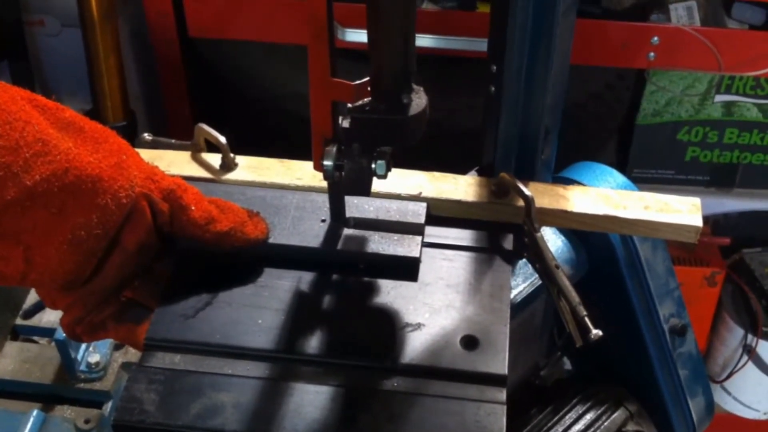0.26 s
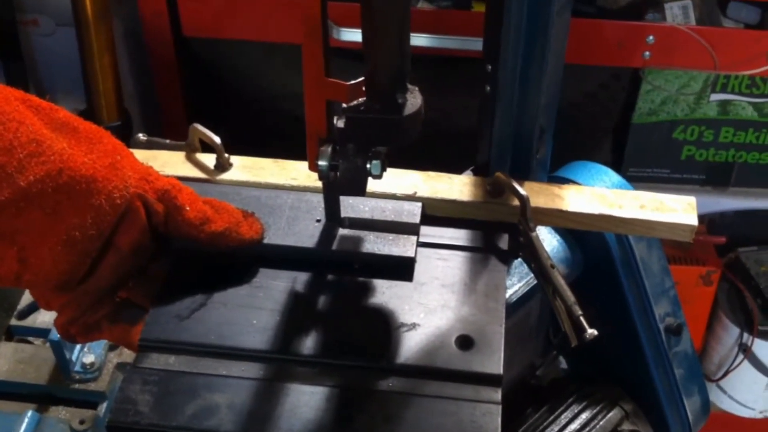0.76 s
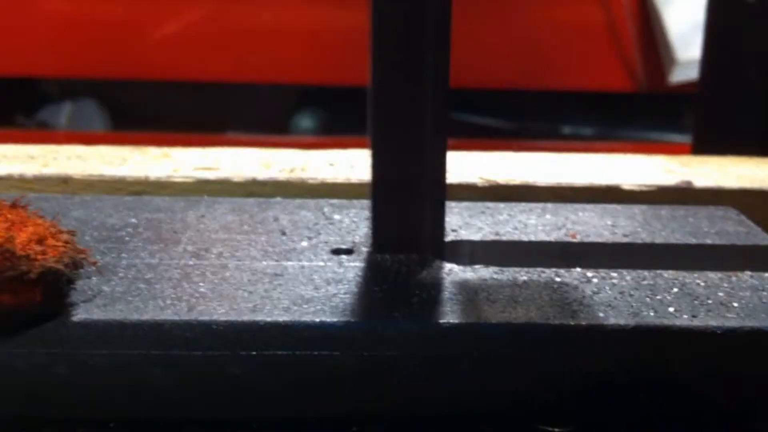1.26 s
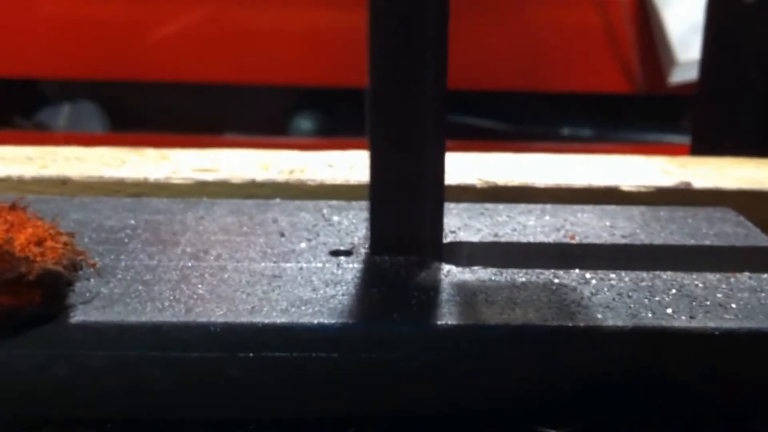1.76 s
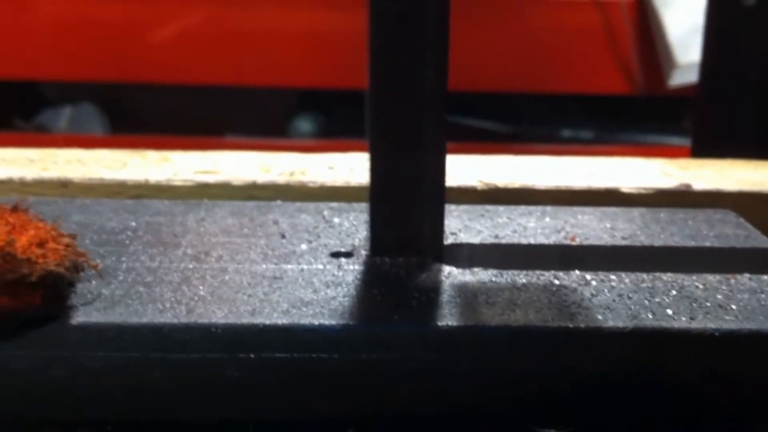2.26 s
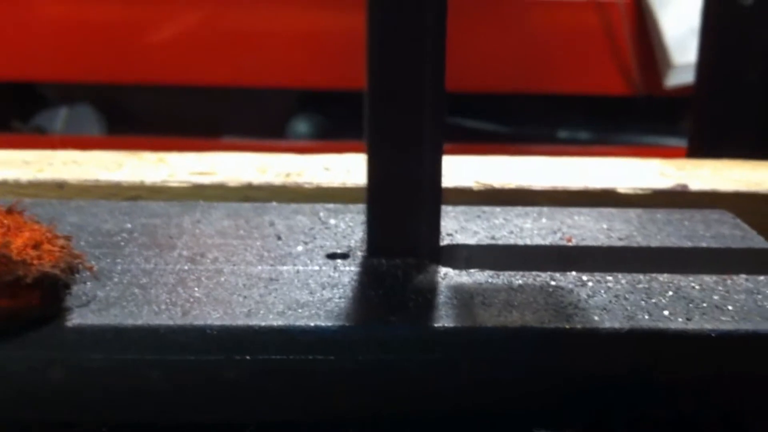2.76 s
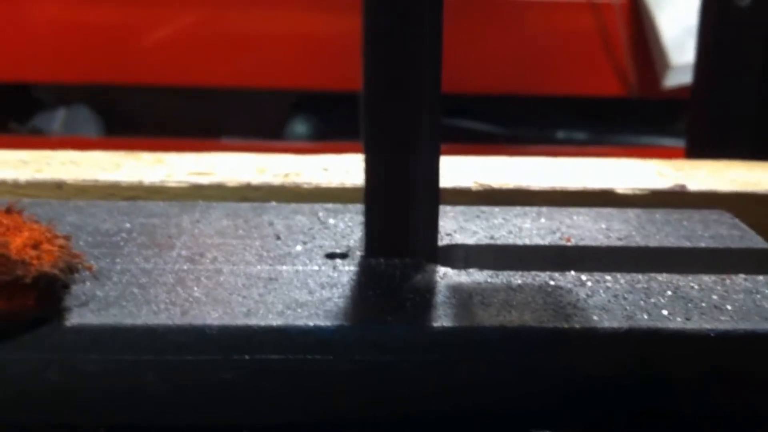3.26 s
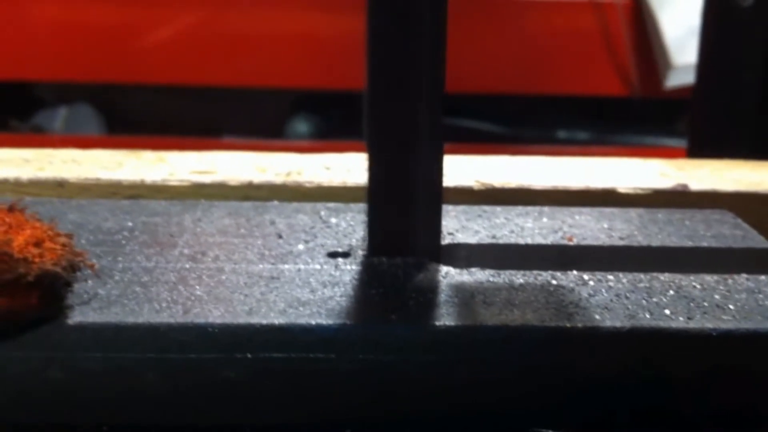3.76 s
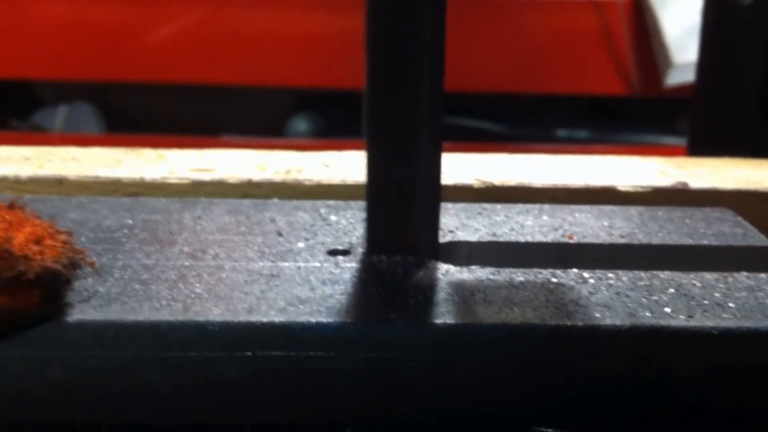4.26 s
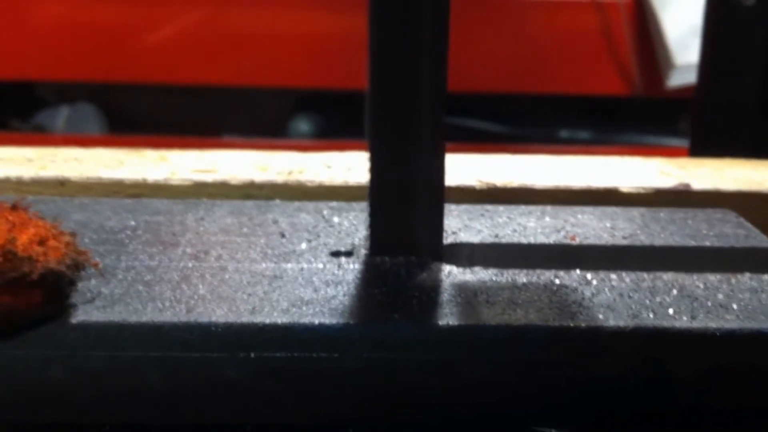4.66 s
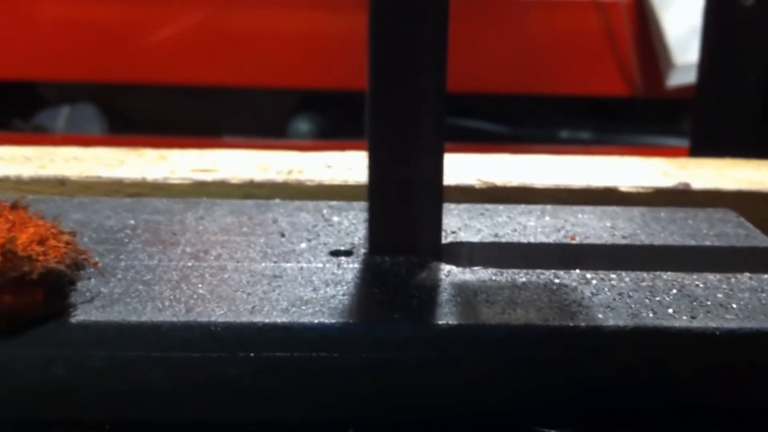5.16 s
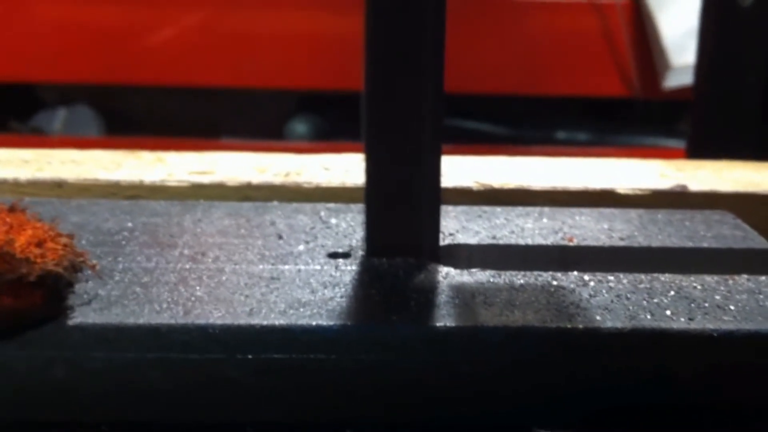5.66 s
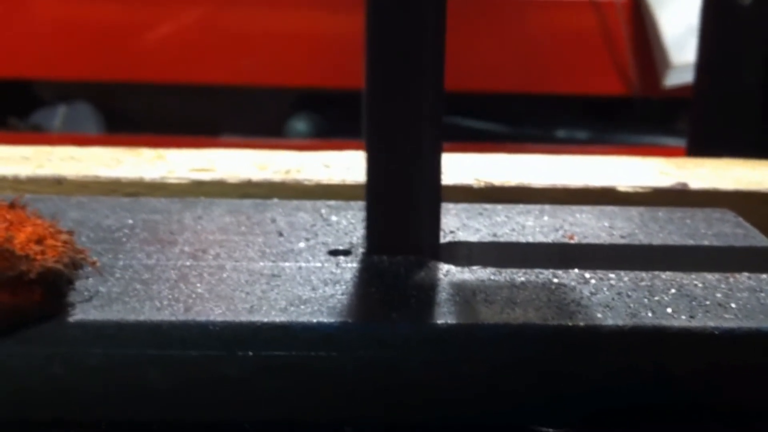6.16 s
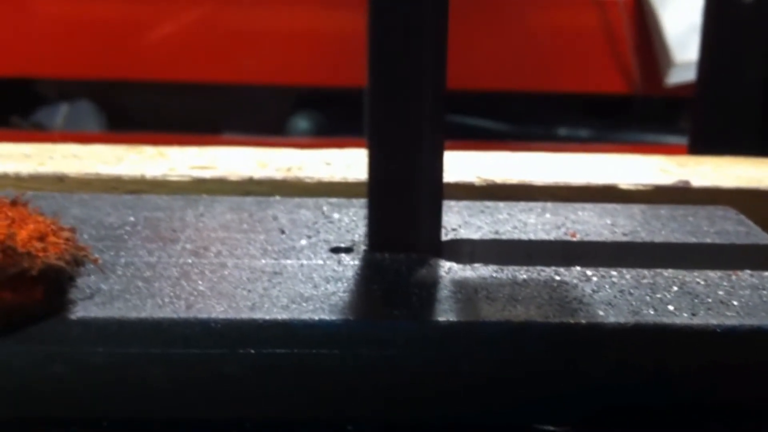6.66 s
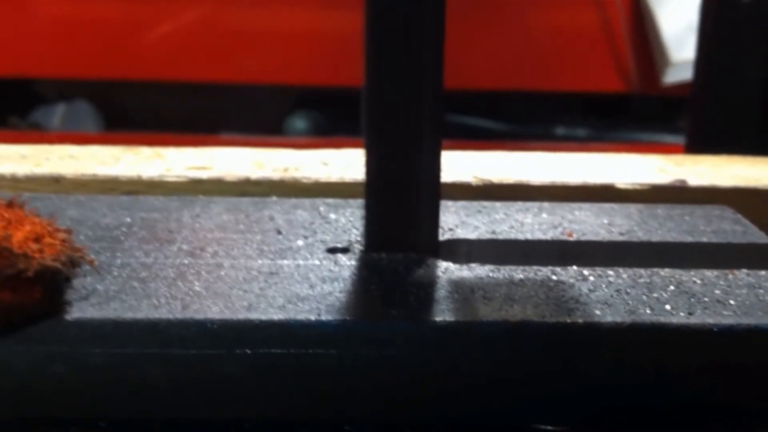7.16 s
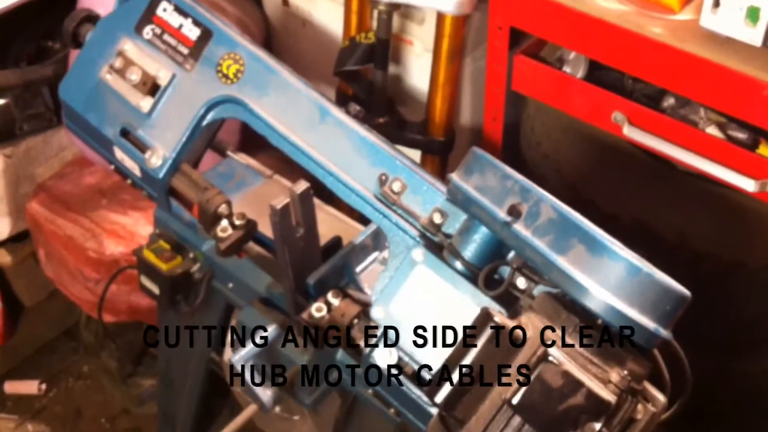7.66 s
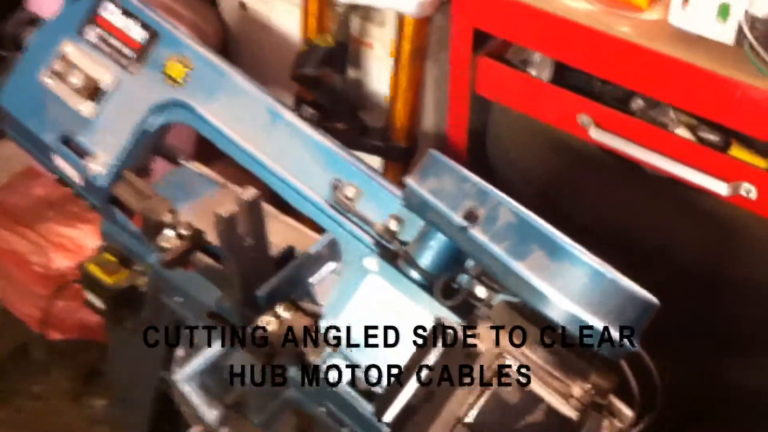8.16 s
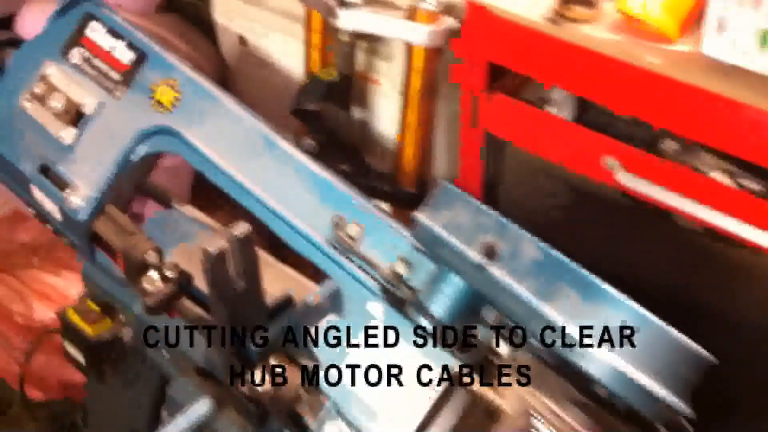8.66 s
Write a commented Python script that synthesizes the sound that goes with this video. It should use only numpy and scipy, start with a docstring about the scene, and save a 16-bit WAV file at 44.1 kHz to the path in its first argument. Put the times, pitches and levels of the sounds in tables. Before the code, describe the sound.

Continuous sawing of steel heard from three microphone positions, separated by gaps under a tenth of a second. First a moderate gritty rasp with several knocks; then a long, loud close rasp, ringing at mid pitch, with thin squeals and irregular knocks over strong hum; last a softer, steadier grind with fading low moan and faint chirping squeaks. Small workshop, mono, abrupt cuts.

```python
"""Band saw cutting steel bar

A saw works in a small workshop, heard in three stretches from three places with short silences between.
Its teeth, random chips over hiss, bite unevenly in a pattern that returns with every lap of the blade.
Their rasp drives resonances of bar, blade and frame; now and then a tooth snags with a knock.
Sines at multiples of twice the mains frequency are the motor hum; coloured noise is the wheel rumble
and a narrow ring the gearbox whine. The last place adds a low moan and faint squeaks."""
import sys
import numpy as np
from scipy import signal
from scipy.fft import rfft, irfft, next_fast_len
from scipy.io import wavfile
from scipy.ndimage import uniform_filter1d

SR = 44100
rng = np.random.default_rng(int(sys.argv[2]) if len(sys.argv) > 2 else 0)


def dump_mix(stems):
    """Bounce the given channels to the path in sys.argv[1] as a 16-bit WAV at rate SR."""
    frames = np.atleast_2d(stems).T  # one column per channel
    limited = np.clip(frames, -1, 1)  # hard clip at full scale
    pcm = np.round(limited * 32767).astype(np.int16)
    wavfile.write(sys.argv[1], SR, pcm)


N = 393372

# Stretches of sawing, one a place. Each row: start in seconds, end in seconds.
STRETCHES_S = [(0, 1.233), (1.33, 7.247), (7.322, 8.92)]
# Share by which the pitch of bar and frame strays, one value a place.
BODY_WANDER_SHARE = [0, 0, .006]


def from_db(db):
    """Amplitude factor of a level in dB."""
    return 10 ** (np.asarray(db) / 20)


def rms_one(x):
    """Scales x to rms 1."""
    return x / np.sqrt(np.mean(x ** 2) + 1e-20)


def drift(rate_hz, size):
    """Slow chance: noise twice through a one-pole low-pass, run in for 1 s; rms 1."""
    r = np.exp(-2 * np.pi * rate_hz / SR)
    slow = signal.lfilter([1], [1, -2 * r, r * r], rng.standard_normal(size + SR))
    return rms_one(slow[SR:])


def colour(x, spectrum):
    """Gives x a smooth spectrum; rms 1."""
    size = next_fast_len(len(x))
    hz, db = np.transpose(spectrum)
    bins_hz = np.arange(size // 2 + 1) * SR / size
    gain = from_db(np.interp(np.log(bins_hz + 1), np.log(hz), db))
    return rms_one(irfft(rfft(x, size) * gain, size)[:len(x)])


def resonate(x, peaks):
    """Parallel two-pole resonances with alternating signs."""
    out = 0
    for k, (hz, width_hz, db) in enumerate(peaks):
        r = np.exp(-np.pi * width_hz / SR)
        b = (1 - r * r) / 2 * np.array([1, 0, -1])
        a = [1, -2 * r * np.cos(2 * np.pi * hz / SR), r * r]
        out = out + (-1) ** k * from_db(db) * signal.lfilter(b, a, x)
    return out


def resonate_twice(x, hz, width_hz, db, widening):
    """One mode passed twice, the second time wider, for steeper skirts."""
    return resonate(resonate(x, [(hz, width_hz, db)]), [(hz, widening * width_hz, 0)])


def steady(x, share):
    """Evens out part of the chance swells in a ring's height; rms 1."""
    height = np.sqrt(uniform_filter1d(x * x, SR // 60)) + 1e-9
    return rms_one(x / height ** np.clip(share, 0, 1))


def caught(x, modes, patchy_db):
    """Each mode is caught and let go on its own as blade and work shift; rms 1."""
    out = 0
    for hz, width_hz, db in modes:
        grip = from_db(patchy_db * drift(9.8, len(x)))
        out = out + grip * resonate_twice(x, hz, width_hz, db, 3.2)
    return rms_one(out)


def wander(x, share):
    """Lets the pitch stray slowly by reading faster and slower."""
    lead = np.cumsum(share * drift(4.0, len(x)))
    index = np.arange(len(x))
    return np.interp(index + lead, index, x, period=len(x))


def cut(place, t):
    """Gains of rasp, bar and squeal: pressure, a swell at each uneven spot of the passing blade, flicker."""
    # Pressure of the work on the blade, a list a stretch. Each row: time in seconds, pressure in dB.
    feed_table = [
        [(0, -1), (.3, -.5), (.85, -1), (1.05, 1), (1.23, 0)],
        [(1.33, 0), (1.8, 0.34), (2.3, 0), (2.8, .5), (3.3, 0), (3.9, -0.5), (4.5, 0.5), (5.0, 0), (5.5, 0),
         (6.2, 0.5), (6.7, 0.9), (7.0, -1.4), (7.25, -1.5)],
        [(7.33, 0), (7.7, 0), (8.3, 1.04), (8.92, 0)],
    ]
    # Uneven spots, met once a lap. Each row: seconds into the lap, half length in seconds,
    # then full rise in dB of rasp, bar ring and squeal.
    spots = [(0.046, 0.036, 3, 9, 5), (0.193, 0.024, 3, 13, 5.5), (0.272, 0.023, 8, 15, 2.5),
             (0.403, 0.04, 3, 5, 4.5), (0.501, 0.032, 5, 14.5, 7), (0.58, 0.0097, 3.5, -5, 0.5),
             (0.7, 0.015, 3.5, 15, 4), (0.933, 0.018, 4, 11, 4), (1.143, 0.026, 4, 16.5, 7),
             (1.247, 0.039, 2, 4, 0.5), (1.367, 0.041, 2, 1, -7), (1.566, 0.017, 3, 14, 3.5),
             (1.8, 0.028, 1, 4, 5.5), (2.034, 0.037, 5.5, 15, 3.5), (2.235, .025, 3, -1, 5),
             (2.353, 0.038, 4, 14, 5.5), (2.455, 0.031, 9.5, 15, 5.5), (2.579, 0.058, 5, 13.5, 3),
             (2.723, 0.027, 2, 13.5, 0.5), (2.815, 0.025, 2.5, 7, 4.5), (3.023, 0.046, 5, 17.5, 4)]
    # Share of each full rise heard, a row a place: rasp, bar, squeal.
    bite_share = [(0.99, 1, 1), (0.87, 0.63, 1), (0.084, 0, 0.23)]
    # How far round the blade is when each stretch begins, in seconds.
    lap_at_start_s = [2.47, 0, 0]
    # Extra squeal at single moments, on top of the lap pattern.
    # Each row: time in seconds, added level in dB.
    extra_squeal = [(2.42, 3.5), (2.69, 17.5), (3.32, 5.5), (3.84, 2.5), (4.03, 3), (4.55, 0), (4.79, 4),
                    (4.93, 1.5), (5.18, 5.5), (5.25, 3), (5.46, 2.5), (5.6, 6.5), (5.87, 13.5), (6.08, 3),
                    (6.53, 6.5), (6.86, 1), (6.92, 1)]
    lap_s, extra_half_s, flicker_hz = 3.183, 0.016, 13.5

    coarse = t[::32]
    feed_db = np.interp(coarse, *np.transpose(feed_table[place]))
    lap = coarse - STRETCHES_S[place][0] + lap_at_start_s[place]
    swells = 0
    for s, half_s, *rises_db in spots:
        away = (lap - s + lap_s / 2) % lap_s - lap_s / 2
        swells = swells + np.outer(rises_db, np.exp(-0.5 * (away / half_s) ** 2))
    rasp_db, bar_db, squeal_db = swells * np.array(bite_share[place])[:, None]
    rasp_db = rasp_db + feed_db
    # bar and squeal follow the pressure by 4 and 0.79 dB per dB
    bar_db = bar_db + 4 * feed_db + 3.5 * drift(flicker_hz, len(t))[::32]
    squeal_db = squeal_db + 0.79 * feed_db + 1.37 * drift(flicker_hz, len(t))[::32]
    for s, db in extra_squeal:
        squeal_db = squeal_db + db * np.exp(-0.5 * ((coarse - s) / extra_half_s) ** 2)
    return [np.interp(t, coarse, from_db(db)) for db in (rasp_db, bar_db, squeal_db)]


def teeth(size, per_s, spread_db, smooth):
    """Chips break at random moments with uneven force, on the smooth hiss of rubbing; rms 1."""
    chips = (rng.random(size) < per_s / SR) * rng.choice([-1, 1], size)
    chips = chips * from_db(spread_db * np.minimum(rng.exponential(1, size), 3.5))
    return rms_one(rms_one(chips) + smooth * rng.standard_normal(size))


def flecks(size):
    """Bigger chips each ring one of the many small modes of bar, vice and table for some cycles; rms 1."""
    pitches_hz = np.geomspace(450, 2500, 24)
    chips = teeth(size, 900, 4.2, 0)
    dealt = rng.integers(0, 24, size)
    out = 0
    for k, hz in enumerate(pitches_hz):
        out = out + resonate(chips * (dealt == k) + 1e-18, [(hz, hz / 89.0, 0)])
    return rms_one(out)


def echoes(x):
    """Bench, walls and shelves send back a spray of early echoes that ripples the spectrum; rms 1."""
    lags_s = rng.uniform(0.0022, 0.03, 14)
    spray = np.zeros(SR // 20)
    spray[(lags_s * SR).astype(int)] = from_db(-11.5 - 60 * lags_s / 0.067) * rng.choice([-1, 1], 14)
    spray[0] = 1
    return rms_one(signal.fftconvolve(x, spray)[:len(x)])


def rasp_sound(place, bite, load, top):
    """Rasp of the teeth: coloured bite with echoes, chip flecks, and a treble with its own swell."""
    # Broad colour, a list a place. Each row: frequency in Hz, relative level in dB per Hz.
    spectra = [
        [(290, -97), (500, -2.5), (657, -12), (758, -16), (1030, -11.5), (2100, -9), (3430, -27.5), (8600, -25),
         (10200, -30.5), (12700, -26), (15500, -39)],
        [(290, -76), (500, -13), (748, -9.5), (1270, -14), (2010, -11), (4020, -24.5), (4770, -25), (5200, -20),
         (5880, -25), (6740, -23), (11300, -30), (15500, -34.5)],
        [(290, -57), (500, -8), (954, -11), (1090, -5), (1330, -12), (2230, -12), (6270, -25.5), (7240, -25),
         (10500, -21.5), (14400, -27), (15500, -33)],
    ]
    size = len(bite)
    coloured = colour(echoes(bite), spectra[place])
    high_pass = signal.butter(2, 4100, "high", fs=SR, output="sos")
    treble = signal.sosfilt(high_pass, coloured)
    chips = from_db(-16.0 + 2.8 * drift(25, size)) * flecks(size)
    return load * (coloured - treble + chips) + top * treble


def bar_sound(place, bite):
    """The bite rings the strongest modes of the bar; rms about 1."""
    # A list a place. Each row: frequency in Hz, width in Hz, relative level in dB.
    modes = [
        [(754, 38, 0)],
        [(744.5, 23, 23), (796, 16, 11)],
        [(376.5, 33, 9.5), (393, 16, 11.5)],
    ]
    ring = steady(resonate(bite, modes[place]), share=0.4)
    return wander(ring, BODY_WANDER_SHARE[place])


def frame_sound(place, bite):
    """The bite rings the frame, mode by mode; rms about 1."""
    # A list a place. Each row: frequency in Hz, width in Hz, relative level in dB.
    modes = [
        [(380, 23, 12), (1157, 42, 5), (2060, 61, -14)],
        [(597.6, 14, 9.5), (823, 340, 2.5), (989, 18, 1.5), (1746, 14, 4.5), (1910, 41, 1.5), (2525, 76, 0.5)],
        [(171, 8, -4), (445, 20, -5), (450, 31, -10), (678, 22, 1), (850, 22, 4), (1080, 41, 5), (2230, 110, 0)],
    ]
    return wander(caught(bite, modes[place], patchy_db=2.8), BODY_WANDER_SHARE[place])


def squeal_sound(place, chatter, flare):
    """Two blade resonances that carry the squeal; a strong squeal spreads to the second."""
    # Two rows a place. Each row: frequency in Hz, width in Hz, level in dB before flare and mix.
    modes = [
        [(8540, 120, 4), (9000, 120, -5)],
        [(5142, 113, 2.5), (5277, 125, -1.5)],
        [(5800, 1100, -1.5), (6240, 250, -10)],
    ]
    rings = []
    for hz, width_hz, db in modes[place]:
        ring = resonate_twice(chatter, hz, width_hz, 0, 2.06)
        rings.append(from_db(db) * steady(ring, share=0.35))
    lower, upper = rings
    return wander(lower + flare * upper, 0.0049)


def blade_sound(place, chatter):
    """The teeth ring further modes of the blade; rms 1."""
    # A list a place. Each row: frequency in Hz, width in Hz, relative level in dB.
    modes = [
        [(4440, 430, -6.5), (5020, 1100, 1), (6600, 110, -13), (12500, 400, -8)],
        [(4455, 144, -3.5), (4580, 37, -10), (6100, 71, -7.5), (6617, 54, -5.5), (7240, 170, -15),
         (7590, 19, -9), (7700, 57, -7), (8700, 810, -15), (11180, 200, -13)],
        [(3980, 79, 4), (10200, 200, 9)],
    ]
    return caught(chatter, modes[place], patchy_db=2.0)


def gearbox_whine(place, size):
    """Noise through one narrow gearbox resonance, its height partly evened."""
    # One row a place: frequency in Hz, width in Hz, level in dB rms before the dips under knocks.
    whines = [(531, 14, -45), (529, 9, -36), (374, 14, -43.5)]
    hz, width_hz, db = whines[place]
    ring = resonate(rng.standard_normal(size), [(hz, width_hz, 0)])
    return from_db(db) * steady(ring, share=0.5)


def rumble(place, load):
    """Coloured noise of wheels and gearbox; a harder bite shakes the wheels more."""
    # A list a place. Each row: frequency in Hz, relative level in dB per Hz.
    spectra = [
        [(15, -63), (25, -31), (137, -25), (194, -0.5), (325, -14), (364, 3.5), (454, -17), (700, -51),
         (910, -5), (1540, -120)],
        [(15, -92), (25, -51), (119, -35), (189, -9), (217, -16), (260, -22.5), (467, -18.5), (700, -21.5),
         (910, -27.5), (1540, -120)],
        [(15, -87), (25, -64), (141, -24), (194, -3.5), (325, -15), (374, -7), (450, -8), (560, -36),
         (700, -43), (910, -53), (1540, -120)],
    ]
    size = len(load)
    shaken = (load / np.mean(load)) ** 1.4 * np.mean(load)
    waver = from_db(1.9 * np.tanh(drift(27, size)))
    return shaken * waver * colour(rng.standard_normal(size), spectra[place])


def motor_hum(place, t, load):
    """Induction motor: sines at multiples of twice the mains frequency, rising with the bite."""
    # A row a place: base level in dB rms of multiples 1 to 4.
    levels_db = [(-64, -43, -48.5, -59), (-52, -29.5, -45, -41.5), (-65.5, -52, -51, -43)]
    hum_hz, size, out = 100.03, len(t), 0
    for k, db in enumerate(levels_db[place]):
        lowest = k == 0   # wavers the most
        wobble_rad = (0.044 + 0.71 * lowest) * drift(4.2, size)
        level = from_db(db + (1.2 + 1.3 * lowest) * drift(4.6, size))
        line = np.sin(2 * np.pi * (k + 1) * hum_hz * t + wobble_rad + k)
        out = out + np.sqrt(2) * load / np.mean(load) * level * line
    return out


def snags():
    """A blow and the judder after it ring the bar's modes; a burst of tearing noise comes with them."""
    # A tooth snags. Each row: time in seconds, relative levels in dB of knock and crack, t60 in seconds
    # of the judder, relative level in dB of the sizzle, lift in dB of the modes above 900 Hz, rise in ms.
    snag_table = [(0.0, -17.5, -24, 0.37, -35, 0, 2.1), (0.114, -15.5, -17, 0.086, -40, 4, 4),
                  (0.235, -24, -38, 0.1, -50, -6, 6), (0.54, -10, -12, 0.14, -22, 4, 3),
                  (0.959, -11, -11, 0.045, -17.5, 10, 2.2), (0.999, -19, -21, 0.31, -42, -7, 3.3),
                  (1.207, -18, -39, 0.069, -47, 1, 2.7), (1.332, -19.5, -24, .08, -48, -8, 3.3),
                  (1.364, -20, -15.5, 0.53, -44, 3, 3.5), (1.592, -9, -7, 0.15, -21, 2, 1.9),
                  (2.258, -11, -31, 0.12, -45, -36, 6.4), (2.444, -1.5, -40, 0.073, -45, -1, 18),
                  (3.354, -8.5, -20, 0.11, -25, -5, 2.8), (3.658, -14, -41.5, 0.22, -45, 9.5, 3.9),
                  (3.764, -9.5, -22, 0.066, -19, 1, 4), (3.789, -18, -25, 0.043, -37, -2, 2.2),
                  (4.28, -30, -26, .05, -45, 27, 2.7), (4.351, -6.5, -12, 0.027, -30, 8, 0.8),
                  (4.546, -13, -8, 0.085, -34, 4, 4), (4.769, -18, -8, 0.05, -16.5, 17.5, 1.6),
                  (4.966, -16, -31, 0.072, -42, -13, 5.5), (5.004, -8.5, -7.5, 0.072, -24, 8, 0.64),
                  (5.016, -17, -30, 0.051, -37, -10, 1.8), (5.392, -13.5, -18, 0.071, -45, 6, 1.9),
                  (5.445, -12.5, -30, 0.041, -45, -5, 4.4), (5.649, -25.5, -26, 0.074, -25, 25.5, 4.7),
                  (6.488, -16, -33, .04, -42, -12, 4.4), (6.54, -3, 5, 0.035, -26, 5, 3.1),
                  (6.748, -10.5, -25, 0.045, -51, -1, 3.3), (6.763, -16, -24, 0.036, -38, 10, 1.7),
                  (6.845, -26.5, -9, 0.056, -21, 19, 1.8), (6.948, -11.5, -19, 0.057, -40, -11, 3.2),
                  (6.962, -5.5, -29, 0.14, -40, 2, 9.9), (8.413, -43, -14, 0.048, -42, 8, 2),
                  (8.497, -43, -15, 0.036, -42, 8, 1.7)]
    # Modes of the bar. Each row: frequency in Hz, relative level in dB, t60 in seconds.
    modes = [(743, 6, 0.035), (634, -13, 0.027), (1038, -14.5, 0.053), (2042, -13, 0.033),
             (2670, -9, 0.0088), (182, -23.5, 0.045)]
    chance_db = rng.normal(0, 4.0, (len(snag_table), len(modes)))
    tear_noise, judder_noise, sizzle_noise = rng.standard_normal((3, N))
    sizzle_band = signal.butter(2, [3800, 11000], "band", fs=SR, output="sos")
    tear_band = signal.butter(2, [500, 4000], "band", fs=SR, output="sos")
    sizzle = rms_one(signal.sosfilt(sizzle_band, sizzle_noise))
    tear = rms_one(signal.sosfilt(tear_band, tear_noise))
    out, size = np.zeros(N), SR // 5
    t = np.arange(size) / SR
    for row, strengths_db in zip(snag_table, chance_db):
        s, knock_db, crack_db, judder_t60_s, sizzle_db, lift_db, rise_ms = row
        rise_ms = max(rise_ms, 0.5)
        at = round(s * SR)
        span = slice(at, at + size)
        dying = from_db(-60 * t / judder_t60_s)
        force = from_db(-29.0) * dying * judder_noise[span]
        force[0] = 1   # the blow
        building = 1 - np.exp(-1000 * t / rise_ms)
        burst = from_db(crack_db - 11.5) * tear[span] + from_db(sizzle_db - 3.5) * sizzle[span]
        sound = dying * building * burst
        for (hz, db, t60_s), more_db in zip(modes, strengths_db):
            r, w = from_db(-60 / (t60_s * SR)), 2 * np.pi * hz / SR
            ring = signal.lfilter([0, np.sin(w)], [1, -2 * r * np.cos(w), r * r], force)
            level_db = knock_db + db + more_db * (db < -3) + lift_db * (hz > 900)
            # the tooth tears free over a few ms, so the ring builds up
            sound += from_db(level_db) * resonate(ring, [(hz, 1000 / np.pi / rise_ms, 0)])
        out[span] += sound
    return out


def moan_sound(t, bite):
    """The bite rings one low, broad resonance whose level falls and wavers."""
    # Each row: time in seconds, level in dB rms before the waver.
    levels = [(7.32, -40), (7.9, -44), (8.35, -42), (8.45, -59), (8.92, -61)]
    level_db = np.interp(t, *np.transpose(levels)) + 3.3 * drift(9.0, len(t))
    return from_db(level_db) * rms_one(resonate_twice(bite, 473, 80, 0, 2))


def squeaks():
    """Short rough tones that swell and fade."""
    # Each row: time in seconds, frequency in Hz, peak level in dB, half length in seconds,
    # share of pitch gained per second, roughness in rad.
    squeak_table = [(8.52, 4050, -39.5, .012, 0, .3), (8.558, 4050, -39.5, .013, 0, .3),
                    (8.845, 2670, -33.5, 0.012, 1.5, .9)]
    t, out = np.arange(N) / SR, np.zeros(N)
    for s, hz, db, half_s, rise, rough_rad in squeak_table:
        swell = np.exp(-0.5 * ((t - s) / half_s) ** 2)
        glide = np.pi * hz * rise * (t - s) ** 2
        phase = 2 * np.pi * hz * t + glide + rough_rad * drift(110, N)
        out += from_db(db) * swell * np.sin(phase)
    return out


def saw(place, t):
    """All steady layers as heard from one place."""
    # Layer levels between the uneven spots, a row a place: rasp, bar, squeal, frame, blade, rumble, in dB.
    mix_db = [(-34.5, -41, -54, -47, -45.5, -39), (-27, -36, -40, -34.5, -36, -30.5),
              (-34.5, -40.5, -47.5, -45, -59, -40)]
    rasp_mix, bar_mix, squeal_mix, frame_mix, blade_mix, rumble_mix = from_db(mix_db[place])
    load, bar, squeal = cut(place, t)
    size = len(t)
    # the bite wavers from tooth to tooth
    flutter = from_db(0.97 * drift(38, size) + 0.066 * drift(74, size))
    bite = flutter * teeth(size, 3000, 0.94, 0.81)
    chatter = flutter * teeth(size, 1500, 0.83, 0.92)
    # the top of the rasp swells with both the bite and the blade
    top = load ** 0.095 * squeal ** 0.023
    top *= np.mean(load) / np.mean(top)
    flare = (squeal / np.mean(squeal)) ** 1.26

    out = rasp_mix * rasp_sound(place, bite, load, top)
    out += bar_mix * bar * bar_sound(place, bite)
    out += frame_mix * load * frame_sound(place, bite)
    out += squeal_mix * squeal * squeal_sound(place, chatter, flare)
    out += blade_mix * top * flare ** 0.11 * blade_sound(place, chatter)
    out += gearbox_whine(place, size)
    out += rumble_mix * rumble(place, load)
    out += motor_hum(place, t, load)
    if place == 2:
        out += moan_sound(t, bite)
    return out


def scene():
    """Plays the saw in each stretch, with snags and squeaks over it."""
    dip_depth, rise_s, drop_db, fade_t60_s = 3.0, 0.0029, -23, 0.027
    t, out = np.arange(N) / SR, np.zeros(N)
    knocks = snags() + squeaks()
    # all steady layers are turned down under knocks so these stand clear, a little under squeaks too
    knock_rms = np.sqrt(uniform_filter1d(knocks ** 2, SR // 200) + 1e-12)
    dip = 1 / (1 + dip_depth * knock_rms)
    for place, (start, end) in enumerate(STRETCHES_S):
        here = (t >= start) & (t < end + 0.05)
        rise = np.clip((t[here] - start) / rise_s + (place == 0), 0, 1)   # the first is on at once
        # the sound drops out at once, a faint trace dies after it
        after = np.maximum(t[here] - end, 0)
        fall = from_db((after > 0) * drop_db - 60 * after / fade_t60_s)
        out[here] += rise * fall * (dip[here] * saw(place, t[here]) + knocks[here])
    return np.array([out, out])


def record(dry):
    """One microphone on both channels; the highest peaks are rounded and the top is cut by 15.8 kHz."""
    low_pass = signal.cheby2(24, 60, 15800, fs=SR, output="sos")
    return signal.sosfilt(low_pass, 0.9 * np.tanh(dry / 1.023))


dry = scene()
out = record(dry)
dump_mix(out)
```